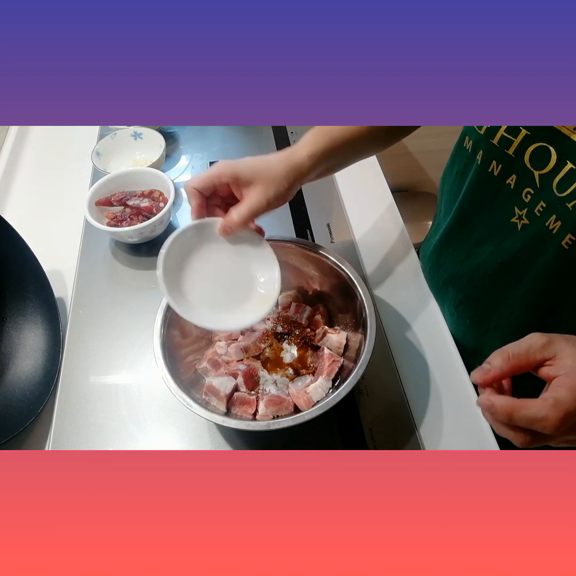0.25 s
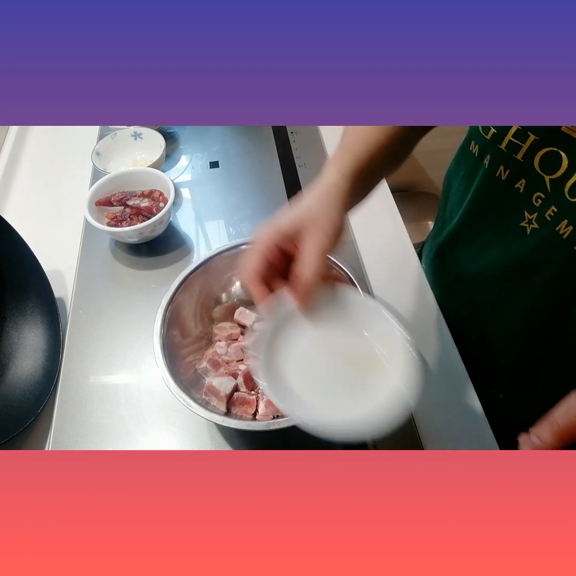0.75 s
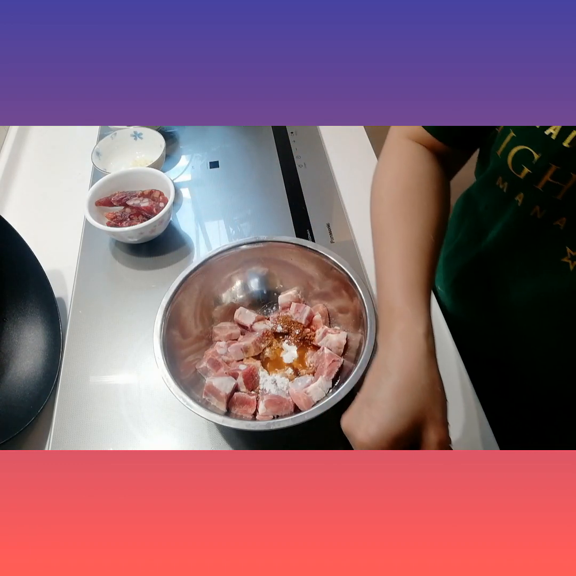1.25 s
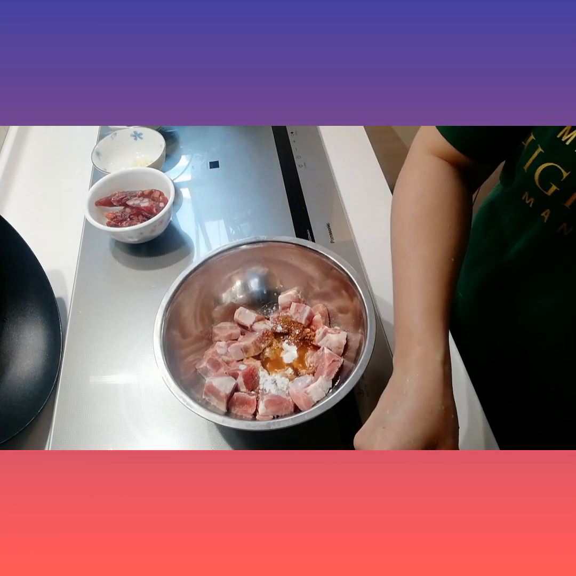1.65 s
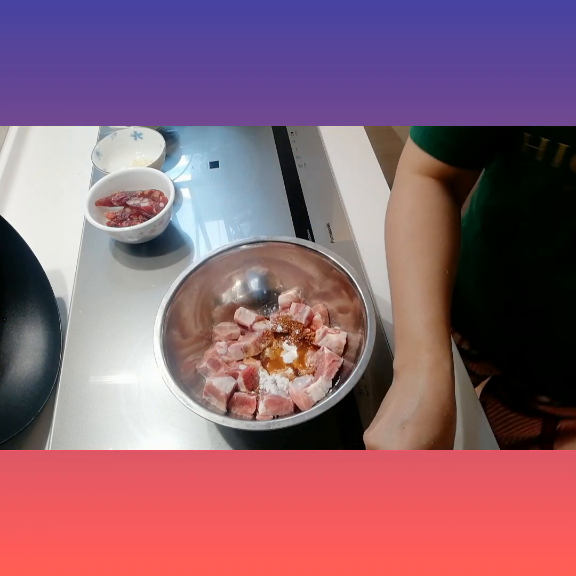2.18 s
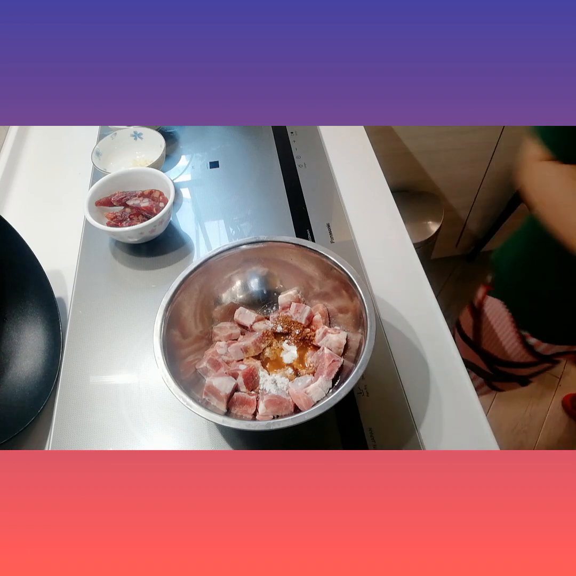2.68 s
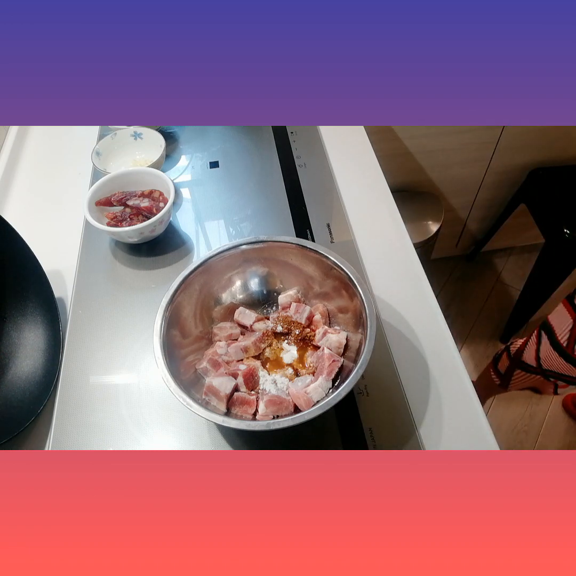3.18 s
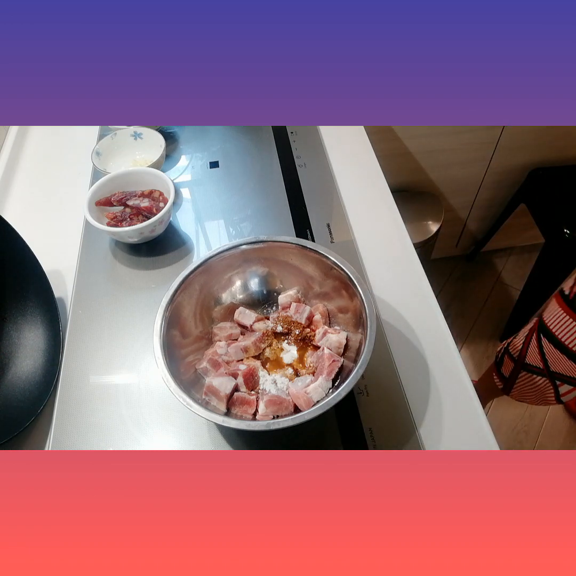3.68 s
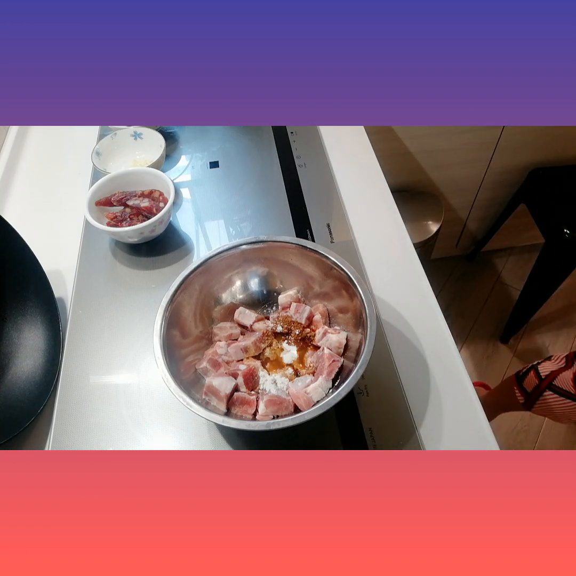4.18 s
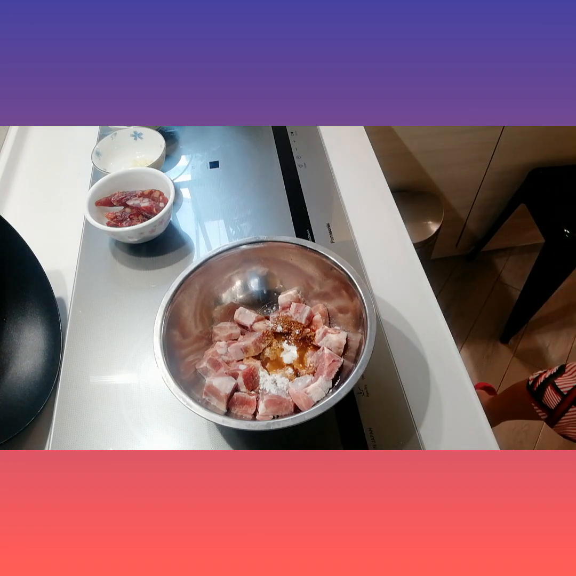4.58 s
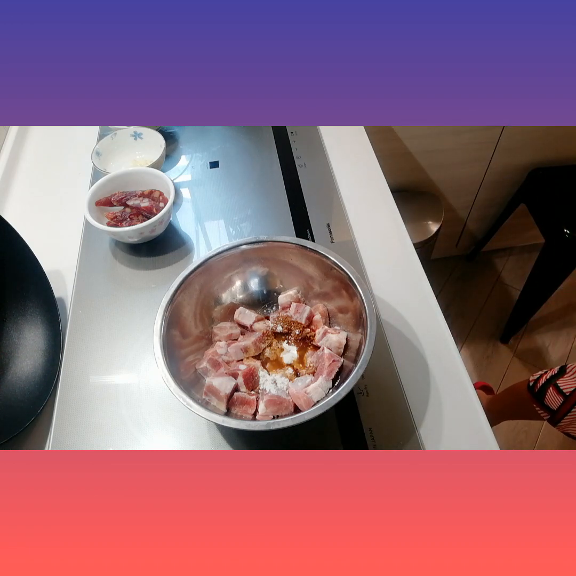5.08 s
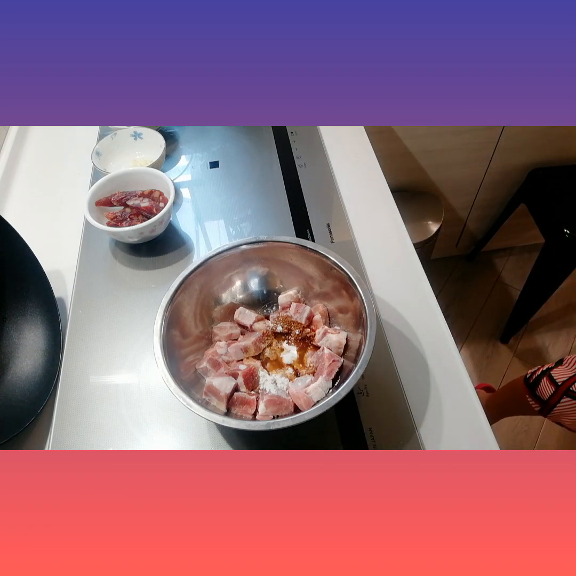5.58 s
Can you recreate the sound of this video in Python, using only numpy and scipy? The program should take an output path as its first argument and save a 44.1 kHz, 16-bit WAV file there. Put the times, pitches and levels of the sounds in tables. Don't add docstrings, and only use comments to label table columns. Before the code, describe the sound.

A quiet, small, hard-walled kitchen with a steady low appliance hum. A china saucer lands with a sharp clack and rocks briefly, then things knock on the counter. Cloth rustles, a cupboard thuds dully, crockery clinks and a bottle cap pops. After a pause with soft floor rumble, glass strikes glass loudly and rings until a hand damps it. Stereo microphones nearby pick up plenty of room reflection.

```python
import sys
import numpy as np
from scipy import signal
from scipy.fft import rfft, irfft, next_fast_len
from scipy.io import wavfile
from scipy.ndimage import uniform_filter1d

SR = 44100
rng = np.random.default_rng(int(sys.argv[2]) if len(sys.argv) > 2 else 0)


def how_loud(loudness_db):
    steps = np.asarray(loudness_db, float) / 20
    return 10 ** steps


def file_out(sig):
    cols = np.atleast_2d(sig).T
    lim = np.clip(cols, -1, 1)
    pcm = np.round(lim * 32767).astype(np.int16)
    wavfile.write(sys.argv[1], SR, pcm)


N = 257544


def at_hz(points, hz):
    table = np.array(points)
    return np.interp(np.log(hz), np.log(table[:, 0]), table[:, 1])


def rms_one(x):
    return x / np.sqrt(np.mean(x ** 2) + 1e-20)


# pitch in Hz, likeness from -1 to 1.
LIKENESS = [(60, 1), (99, 0.98), (160, .97), (270, 0.55), (450, -0.2), (740, -0.29), (1220, 0.2),
            (2010, 0.05), (3330, 0.05), (5500, -0.12), (9080, -0.054), (15000, -0.03)]
# pitch in Hz, left minus right in dB.
SIDE_LEAN = [(60, 0), (110, 0), (200, 1), (380, -3.5), (700, -0.5), (1290, 1.5), (2380, 1.5), (4400, -1),
             (8120, 1.5), (15000, 14.5)]


def diffuse(size, tone, near=0):
    hz = np.maximum(np.arange(size // 2 + 1) * SR / size, 1)
    alike = np.clip(at_hz(LIKENESS, hz), -1, 1)
    mid, side = rfft(rng.standard_normal((2, size)))
    pair = np.sqrt(1 + alike) * mid + np.sqrt(1 - alike) * side * [[1], [-1]]
    lean_db = near * at_hz(SIDE_LEAN, hz) / 2
    return hz, pair * how_loud(at_hz(tone, hz) + np.array([lean_db, -lean_db]))


def hiss(tone, near=0):
    size = next_fast_len(N)
    hz, pair = diffuse(size, tone, near)
    return rms_one(irfft(pair, size)[:, :N])


def resonance(hz, radius):
    return [1, -2 * radius * np.cos(2 * np.pi * hz / SR), radius * radius]


def ring(push, hz, t60):
    radius = how_loud(-60 / (t60 * SR))
    return signal.lfilter([0, np.sin(2 * np.pi * hz / SR)], resonance(hz, radius), push + 1e-18)


# pitch in Hz, time to fall 60 dB in seconds.
KITCHEN = [(60, 0.11), (250, 0.72), (1000, 0.59), (3000, 0.64), (8000, 0.54), (14000, 0.36)]


def echoes(tone, rise_s, early_s, tail_db):
    size = 2 ** 15
    hz, pair = diffuse(size, tone, near=1.0)
    t = np.arange(size) / SR
    octave = np.log2(hz / 30)
    out = 0
    for k in range(10):
        centre = 30 * 2 ** k
        band = irfft(pair * np.clip(1 - abs(octave - k), 0, 1), size)
        slow = 1 / centre
        cluster = np.exp(-t / (early_s + 2 * slow))
        tail = how_loud(tail_db - 60 * t / at_hz(KITCHEN, centre))
        out = out + band * (1 - np.exp(-t / (rise_s + slow))) * (cluster + tail)
    return out / np.sqrt(np.mean(out[:, :800] ** 2))


def blows(hits, tone, modes, ring_db, split_hz, rise_s, early_s, tail_db, pan_db):
    start = int(hits[0][0] * SR)
    body, treble = np.zeros((2, N - start))
    t = np.arange(4000) / SR
    for (s, db, length), rough in zip(hits, rng.standard_normal((16, len(t)))):
        scuff = rough * np.exp(-t / max(length, 1e-4))
        push = 1.08 * scuff / np.sqrt(np.sum(scuff ** 2))
        push[0] = 1
        i = int(s * SR) - start
        body[i:i + len(t)] += push * how_loud(db - 15.5)
        treble[i:i + len(t)] += push * how_loud(db - 12.5)
    low = signal.butter(2, split_hz, "low", fs=SR)
    high = signal.butter(2, split_hz, "high", fs=SR)
    contact = signal.lfilter(*low, body) - signal.lfilter(*high, treble)
    room = echoes(tone, rise_s, early_s, tail_db)
    source = contact.copy()
    first = signal.fftconvolve(contact[None, :2000], room[:, :8000], axes=1)
    for hz, db, t60 in modes:
        turning = np.exp(-2j * np.pi * hz * np.arange(first.shape[1]) / SR)
        reach = np.linalg.norm(first @ turning)
        source += how_loud(ring_db + db) / reach * ring(contact, hz, t60)
    wet = signal.fftconvolve(source[None], room, axes=1)[:, :N - start]
    return np.pad(wet, ((0, 0), (start, 0))) * how_loud([[pan_db / 2], [-pan_db / 2]])


def swells(rows, rise_db, fall_db):
    s, db, length = np.transpose(rows)[:, :, None]
    late = (np.arange(N) / SR - s) / np.maximum(length, .01)
    gains = how_loud(db + np.minimum(rise_db * late, -fall_db * late))
    return np.sqrt(np.sum(gains ** 2, axis=0))


GRASP_S, GRASP_DB_PER_S = 5.43, 122
SIDE_LAG_S = .0006


def direct(rows, rise_s):
    out = np.zeros((2, N + SR))
    t = np.arange(SR) / SR
    for s, db, hz, t60 in rows:
        swing = (1 - np.exp(-t / rise_s)) * np.sin(2 * np.pi * hz * t) * how_loud(db - 60 * t / t60)
        swing *= how_loud(-GRASP_DB_PER_S * np.maximum(s + t - GRASP_S, 0))
        for side in range(2):
            i = int((s + side * SIDE_LAG_S) * SR)
            out[side, i:i + SR] += swing
    return out[:, :N]


# pitch in Hz, level in dB.
AIR_TONE = [(12, -46), (20, -7), (68, -10.5), (101, -7.5), (210, -12.5), (255, -14.5), (301, -9.5),
            (357, -21.5), (558, -13.5), (802, -12.5), (1290, -21.5), (1760, -20.5), (2260, -27.5),
            (3160, -28.5), (16000, -43)]
# pitch in Hz, width in Hz, level in dB.
DRONES = [(104.5, 7.3, -59.5), (147.5, 12, -61.5), (212.5, 29, -63), (308.4, 17.2, -62), (802, 20, -67),
          (1222, 22, -71)]


def appliances():
    out = how_loud(-53.5) * hiss(AIR_TONE)
    white = hiss([(10, 0), (20000, 0)])
    for hz, width, db in DRONES:
        section = [1, 0, -1] + resonance(hz, np.exp(-np.pi * width / SR))
        out = out + how_loud(db) * rms_one(signal.sosfilt([section, section], white))
    return out


# peak in seconds, level in dB, length in seconds.
STEPS = [(2.4, -66, 0.059), (2.62, -81, 0.045), (2.92, -49.5, 0.073), (3.41, -36, 0.023),
         (3.556, -39.5, 0.045), (3.72, -47, 0.15), (3.95, -42, .1), (4.15, -54, 0.21), (4.35, -46.5, 0.12),
         (4.75, -50, .2), (5.48, -39, 0.047), (5.585, -38, 0.04), (5.78, -49.5, 0.12)]


def floor_rumble():
    tone = [(25, -34), (55, -2.5), (95, -2.0), (150, -1.5), (260, -28), (1000, -82.5)]
    return how_loud(-4.0) * swells(STEPS, rise_db=10.5, fall_db=8) * hiss(tone)


# peak in seconds, level in dB, length in seconds.
RUSTLE = [(2.52, -64.5, 0.04), (2.69, -55, 0.077), (2.89, -65.5, 0.2), (3.42, -57.5, 0.13),
          (4.2, -70, 0.69), (4.41, -63, 0.032), (5.65, -68, .15)]
# pitch in Hz, level in dB.
RUSTLE_TONE = [(1180, -32.5), (2000, -7), (2870, -6), (3290, -7), (4320, -11), (4440, -14), (10200, -9.5),
               (15500, -30)]


def cloth_rustle():
    grain_db = 1.5 * np.repeat(rng.standard_normal(N // 200 + 1), 200)[:N]
    grain = uniform_filter1d(how_loud(grain_db), size=150)
    return how_loud(2.0) * swells(RUSTLE, rise_db=10.5, fall_db=9.5) * hiss(RUSTLE_TONE, near=1) * grain


# start in seconds, peak in dB, contact length in seconds.
TICK_HITS = [(2.137, -28, 0.0018), (2.198, -32, 0.028), (2.6817, -48.5, 0.0088), (2.8705, -54, 0.008),
             (3.259, -53, 0.008), (3.3654, -49, 0.008), (3.3873, -42.5, 0.01), (3.4344, -45, 0.0087),
             (3.4887, -40, 0.0075), (3.498, -35, 0.021), (4.3988, -60, 0.0069), (5.4544, -43, 0.008),
             (5.5574, -52.5, 0.0087), (5.6396, -51.5, 0.0067)]
# pitch in Hz, level in dB per Hz.
TICK_TONE = [(350, -34), (600, -6), (1050, 0), (1250, -3.5), (1960, -10), (2750, -6), (5360, -8.5),
             (9240, -5), (15500, -20.5)]


def handling_ticks():
    return blows(TICK_HITS, TICK_TONE, [], 0, 4800, rise_s=0.00014, early_s=0.0084, tail_db=-8.5, pan_db=-1.0)


# start in seconds, level in dB, pitch in Hz, time to fall 60 dB in seconds.
BOOMS = [
    (1.523, -50, 205, .12),
    (1.893, -44, 208, 0.16),
    (2.025, -43, 281.5, 0.47),
    (2.14, -37, 208, 0.16),
    (3.258, -31, 125.5, .35),
    (3.265, -34, 320, 0.29),
    (3.298, -33, 101, 0.26),
    (3.385, -30, 83, 0.12),
    (5.128, -31, 92.6, .2),
    (5.135, -35, 223, .3),
]


def furniture_booms():
    return direct(BOOMS, rise_s=0.0053)


# start in seconds, peak in dB, contact length in seconds.
DOOR_HITS = [
    (2.143, -48, 0.0051),
    (3.257, -25, 0.0087),
    (3.299, -33, 0.014),
    (3.385, -41.5, 0.0042),
    (3.928, -44.5, 0.0091),
    (5.125, -30, 0.0034),
    (5.464, -43.5, 0.0045),
    (5.556, -38.5, 0.016),
]
# pitch in Hz, level in dB per Hz.
DOOR_TONE = [(36, -51), (62, -10.5), (117, -6), (187, -17.5), (265, -23), (324, -15), (369, -16),
             (684, -27), (853, -32), (911, -24.5), (1700, -28), (2740, -42.5), (12000, -59), (15600, -87),
             (22000, -120)]
# pitch in Hz, level in dB, time to fall 60 dB in seconds.
DOOR = [(118, 0, .08), (323, -10, .08)]


def cupboard_thuds():
    return blows(DOOR_HITS, DOOR_TONE, DOOR, -53, 500, rise_s=0.0024, early_s=0.02, tail_db=-8.5, pan_db=0.3)


# start in seconds, peak in dB, contact length in seconds.
COUNTER_HITS = [
    (1.888, -23.5, 0.0079),
    (1.894, -20.5, 0.001),
    (2.01, -18, 0.002),
    (2.029, -21.5, 0.0092),
]
# pitch in Hz, level in dB per Hz.
COUNTER_TONE = [(88, -30), (150, -15), (296, -4.5), (462, -10), (722, -6), (1420, -10), (1600, -15),
                (1940, -10.5), (3830, -8.5), (4560, -10), (10100, -5), (15500, -31.5)]
# pitch in Hz, level in dB, time to fall 60 dB in seconds.
COUNTER = [(210, 7, .06), (300, 2, .04), (880, -6, .03), (1950, -3, .03), (10000, -3, .02)]


def counter_knocks():
    return blows(COUNTER_HITS, COUNTER_TONE, COUNTER, -46.5, 1600,
                 rise_s=0.000077, early_s=0.0071, tail_db=-19, pan_db=0.4)


# start in seconds, peak in dB, contact length in seconds.
SAUCER_HITS = [
    (1.522, -13.5, 0.0053),
]
# pitch in Hz, level in dB per Hz.
SAUCER_TONE = [(88, -76), (150, -25), (620, -18.5), (830, -6.5), (1270, -23.5), (1760, -8.5), (2410, -29.5),
               (3300, -10), (5540, -22), (6860, -13.5), (8330, -21.5), (9180, -15), (12500, -22),
               (15500, -64)]
# pitch in Hz, level in dB, time to fall 60 dB in seconds.
SAUCER = [(205, -17, .05), (840, -10, .03), (1690, -20, .03), (1776, -15, .04), (2900, -12, .015),
          (3300, -6, .015), (3978, -8, .025), (6691, -12, .04), (7106, -12, .05), (9222, -5, .04),
          (11090, -4, .04), (11900, -8, .07)]


def saucer_set_down():
    return blows(SAUCER_HITS, SAUCER_TONE, SAUCER, -15.5, 2900,
                 rise_s=0.00096, early_s=0.0082, tail_db=-18.5, pan_db=0.5)


# start in seconds, peak in dB, contact length in seconds.
ROCK_HITS = [
    (1.624, -22, 0.00035),
    (1.6743, -27.5, 0.0011),
    (1.796, -47.5, 0.002),
    (1.8344, -70, 0.0018),
]
# pitch in Hz, level in dB per Hz.
ROCK_TONE = [(240, -37), (400, -7), (860, 1), (1690, -3.5), (2430, -13), (3510, 2), (4160, -3), (5150, 0.5),
             (9500, -5.5), (13500, -11.5), (15500, -52)]
# pitch in Hz, level in dB, time to fall 60 dB in seconds.
ROCK = [(3410, -3, .03), (4980, 0, .04), (7050, -4, .03), (9430, -4, .03), (11200, -8, .03)]


def saucer_rocks():
    return blows(ROCK_HITS, ROCK_TONE, ROCK, -47.0, 2517,
                 rise_s=0.00054, early_s=0.01, tail_db=-18.5, pan_db=0.0)


# start in seconds, peak in dB, contact length in seconds.
LIFT_HITS = [
    (3.518, -26.5, 0.0035),
]
# pitch in Hz, level in dB per Hz.
LIFT_TONE = [(180, -27), (300, -5), (562, -4.5), (696, -11), (968, -5), (1730, -11.5), (2210, -1.5),
             (2700, -10), (5130, -23), (10400, -19), (15500, -45)]


def crockery_lift():
    modes = [(2280, 0, 0.03), (2080, -2, 0.023)]   # Hz, dB, seconds to fall 60 dB
    return blows(LIFT_HITS, LIFT_TONE, modes, -34.5, 3500,
                 rise_s=0.0016, early_s=0.033, tail_db=-4.5, pan_db=1.5)


# start in seconds, peak in dB, contact length in seconds.
CAP_HITS = [
    (3.728, -23, 0.002),
]
# pitch in Hz, level in dB per Hz.
CAP_TONE = [(290, -52), (500, -22), (758, -28), (815, -14.5), (1030, -12), (1350, -13), (1470, -12.5),
            (2760, -15.5), (3500, -3.5), (4500, -15.5), (11300, -15), (13600, -29), (15500, -86)]
# pitch in Hz, level in dB, time to fall 60 dB in seconds.
CAP = [(1020, 0, .07), (1170, -2, .07), (2500, -8, .04), (3400, 0, .025), (3700, -2, .02), (11000, -6, .03)]


def cap_pop():
    return blows(CAP_HITS, CAP_TONE, CAP, -28, 2750, rise_s=0.00046, early_s=0.043, tail_db=-10.0, pan_db=0.7)


# start in seconds, peak in dB, contact length in seconds.
TOUCH_HITS = [
    (5.011, -22.5, 0.025),
    (5.067, -36, 0.017),
]
# pitch in Hz, level in dB per Hz.
TOUCH_TONE = [(180, -60), (300, -32), (696, -16), (877, 0), (1240, -4), (2040, -12.5), (2880, -12),
              (4720, -27), (6000, -28), (9450, -22), (15500, -51.5)]


def glass_touch():
    return blows(TOUCH_HITS, TOUCH_TONE, [(9200, 0.0033, .06)], -46, 3600,
                 rise_s=.005, early_s=0.016, tail_db=-11.5, pan_db=-1.5)


# start in seconds, peak in dB, contact length in seconds.
GLASS_HITS = [
    (5.108, -10.5, 0.0041),
    (5.112, -10, 0.0061),
    (5.122, -14.5, 0.003),
]
# pitch in Hz, level in dB per Hz.
GLASS_TONE = [(120, -43), (250, -16.5), (420, -15.5), (800, 0), (1620, -1.5), (2470, -9.5), (2900, -3),
              (3960, -13), (4900, -1), (5600, -13.5), (9310, -6.5), (12900, -20), (15500, -87)]
GLASS_HZ = [1412, 2166, 2198, 2905, 2946, 3192, 3697, 4499, 4564, 4971, 5015, 6831, 7284, 8956, 9160, 9647,
            9851, 10430, 10531, 11060]
# level in dB, time to fall 60 dB in seconds.
GLASS_RING = [(-9, .3), (-10, .2), (-10, .2), (-12, .2), (-13, .3), (-13, .12), (-12, .25), (-11, .2),
              (-8, .3), (-12, .3), (-14, .2), (-14, .15), (-16, .15), (-10, .3), (-8, .25), (-6, .22),
              (-13, .15), (-15, .15), (-9, .15), (-7, .2)]


def glass_knock():
    return blows(GLASS_HITS, GLASS_TONE, np.c_[GLASS_HZ, GLASS_RING], -18, 3700,
                 rise_s=0.0029, early_s=0.012, tail_db=-2.0, pan_db=-0.5)


# start in seconds, level in dB, pitch in Hz,
# time to fall 60 dB in seconds.
CHIMES = [
    (1.523, -27, 1785, .2),
    (3.52, -33, 2250, .15),
    (5.112, -22, 2905, .85),
    (5.112, -21, 4499, .55),
    (5.118, -29, 5015, .7),
    (5.112, -28, 8956, .45),
    (5.112, -28, 9647, .35),
]


def chimes():
    return direct(CHIMES, rise_s=0.0044)


def scene():
    out = appliances() + floor_rumble() + cloth_rustle()
    out += handling_ticks() + furniture_booms() + cupboard_thuds() + counter_knocks()
    out += saucer_set_down() + saucer_rocks() + crockery_lift() + cap_pop()
    out += glass_touch() + glass_knock() + chimes()
    return out


def low_pass(x):
    return signal.sosfilt(signal.butter(12, 16150, fs=SR, output="sos"), x)


def record(dry):
    top_cut = signal.cheby2(12, 60, 16500, fs=SR, output="sos")
    heard = signal.sosfilt(top_cut, dry)
    return low_pass(heard)


dry = scene()
out = record(dry)
file_out(out)
```